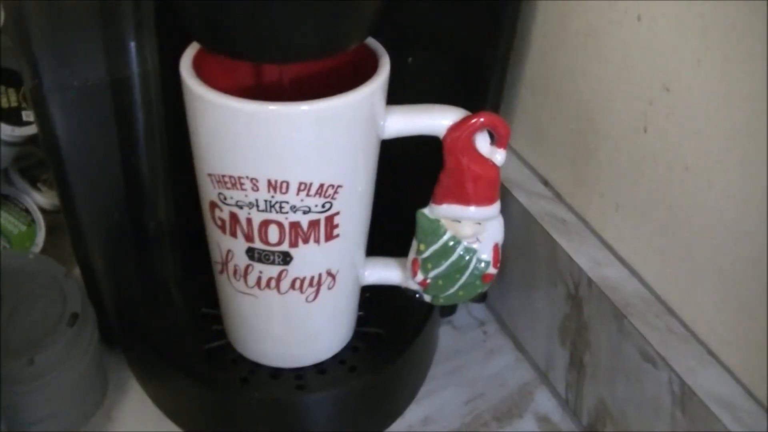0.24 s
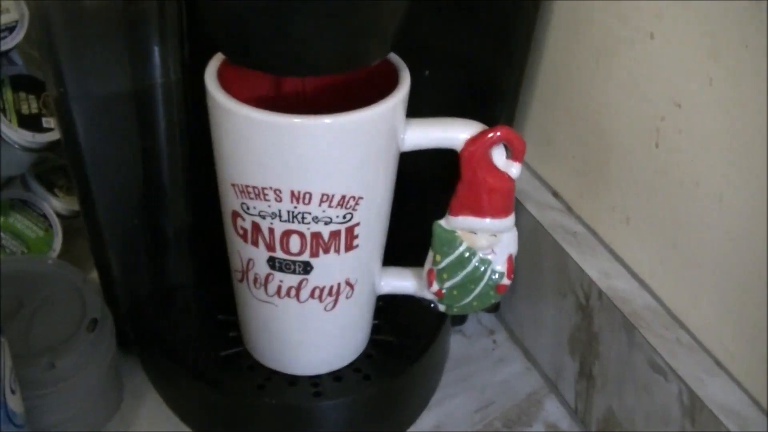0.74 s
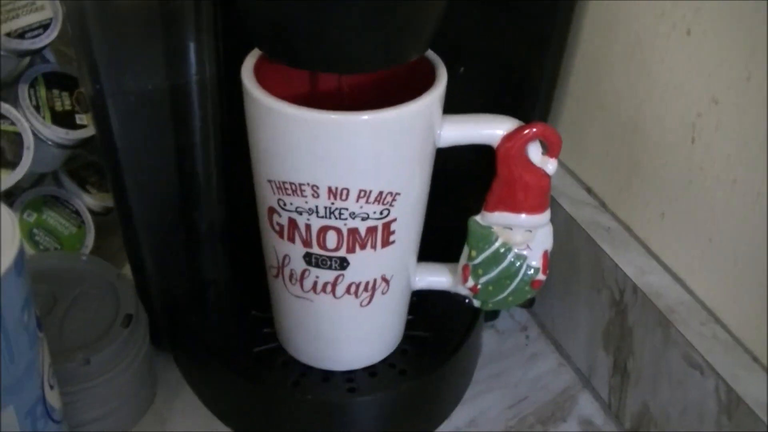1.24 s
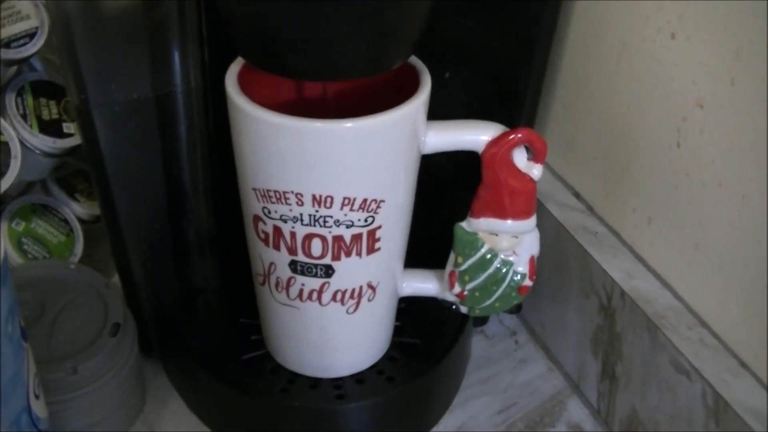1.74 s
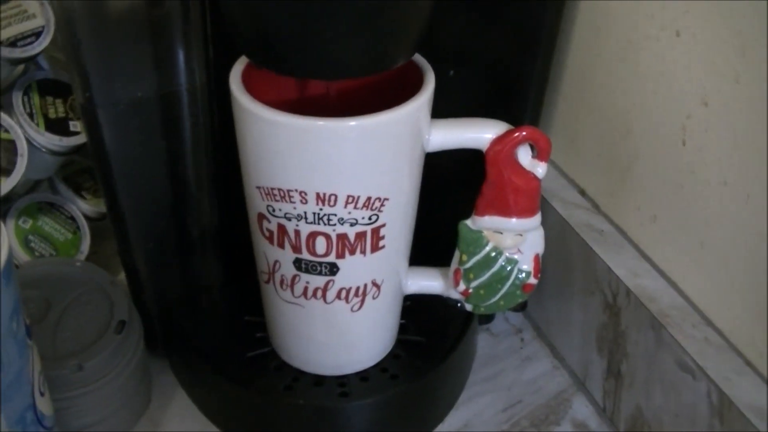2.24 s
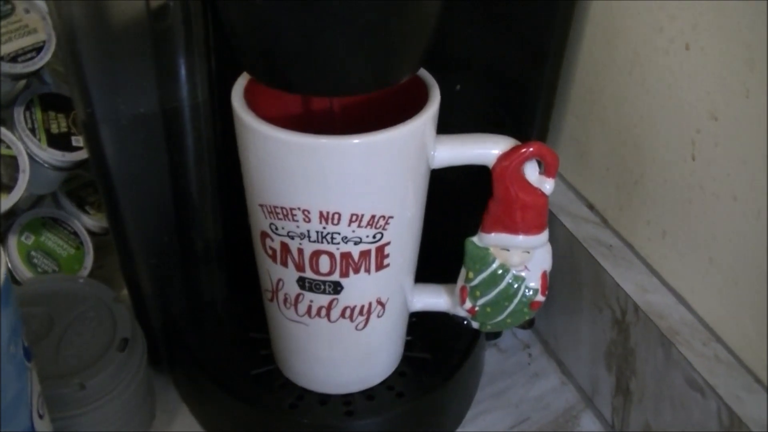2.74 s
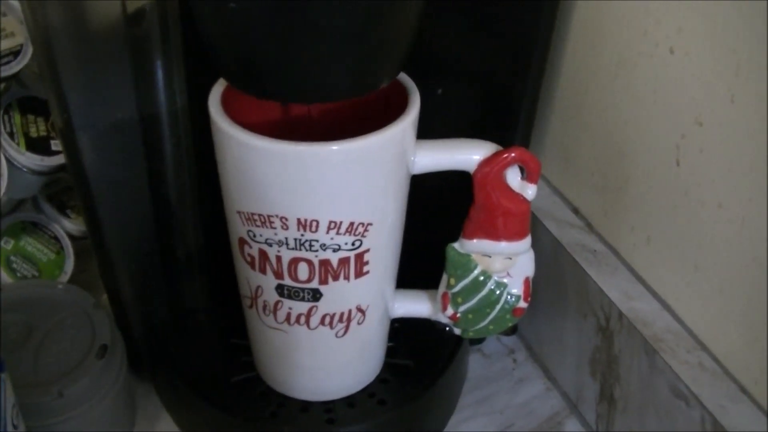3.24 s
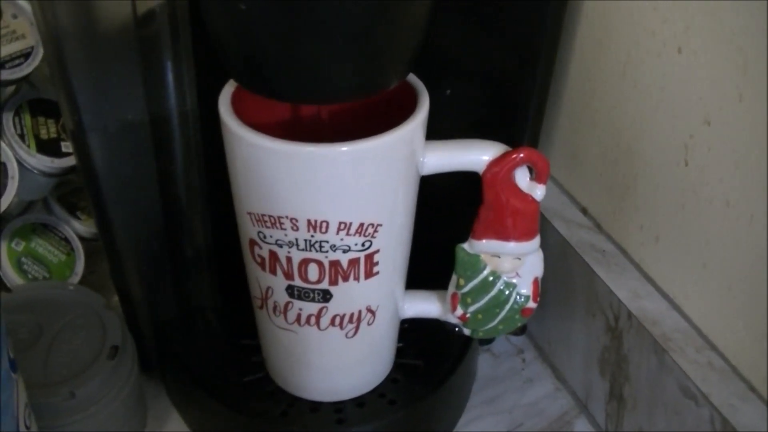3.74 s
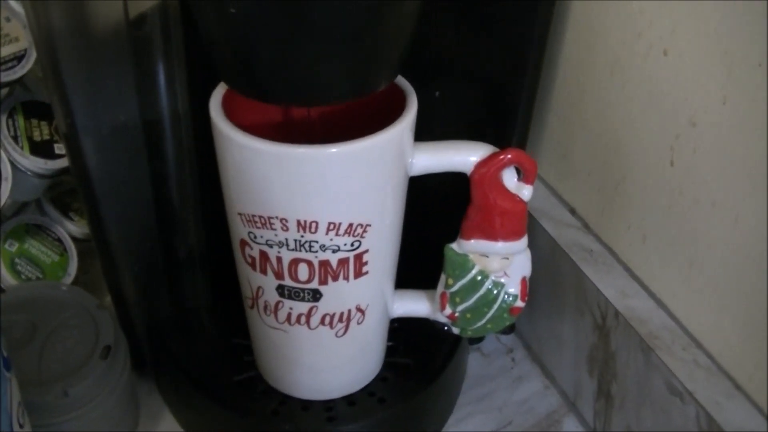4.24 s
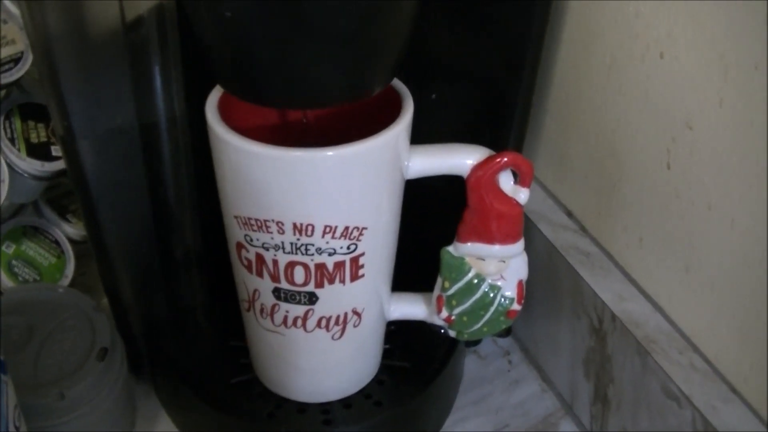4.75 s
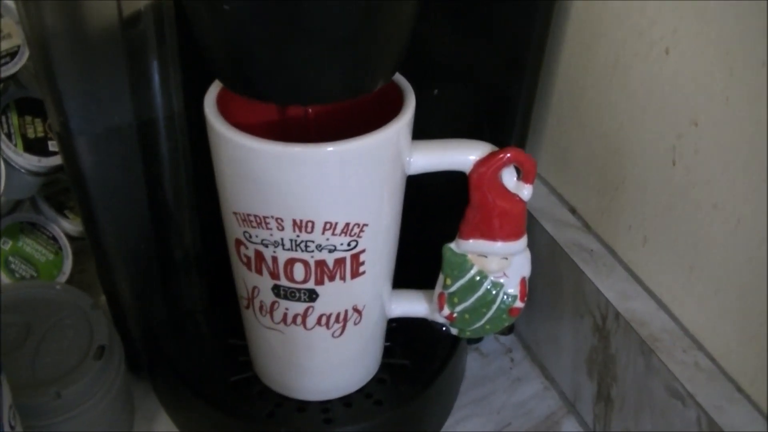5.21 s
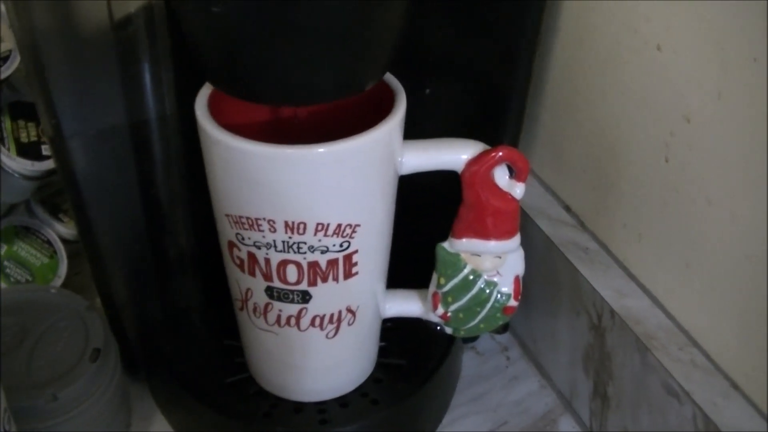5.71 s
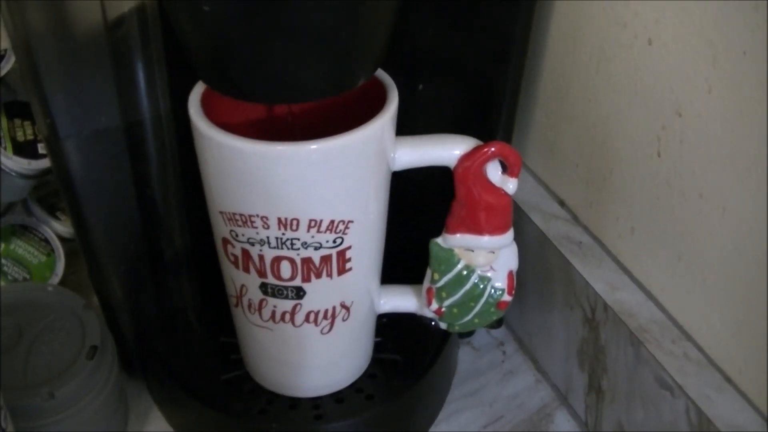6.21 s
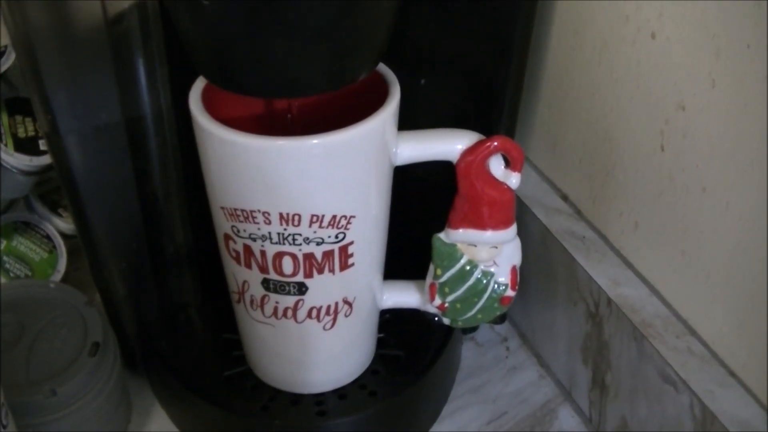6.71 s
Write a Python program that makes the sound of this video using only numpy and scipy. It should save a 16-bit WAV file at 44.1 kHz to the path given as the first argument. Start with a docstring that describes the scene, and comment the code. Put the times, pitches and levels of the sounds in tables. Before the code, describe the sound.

Two sharp plastic snaps, then a small coffee maker's pump hums and rattles steadily while drops plop, before it cuts out into wet sputtering.

```python
"""Two sharp snaps with hollow knocks are heard first, over the running pump of a small coffee maker.
The pump hums on multiples of its shaft turn, rattles, hisses and whines; drops tick and plop in a tall mug.
Near the end the pump stops, and air and water sputter from the spout into the mug.
Snaps, knocks and plops are dying sines; ticks, rattle and sputter are shaped noise; the hum is one
changing waveform per turn. A close hand-held stereo recorder hears it all over room noise and hiss."""
import sys
import numpy as np
from scipy import signal
from scipy.fft import rfft, irfft, next_fast_len
from scipy.io import wavfile
from scipy.ndimage import uniform_filter1d, map_coordinates

SR = 44100
rng = np.random.default_rng(int(sys.argv[2]) if len(sys.argv) > 2 else 0)


def unload_audio(sound):
    """Save the sound as a 16-bit wav file, at the path given as the first command line argument."""
    columns = np.transpose(np.atleast_2d(sound))
    # keep every value between -1 and 1, then stretch to whole-number steps
    steps = np.round(np.clip(columns, -1, 1) * 32767)
    wavfile.write(sys.argv[1], SR, steps.astype(np.int16))


N = 307377
T = np.arange(N) / SR  # seconds
SIZE = next_fast_len(N)
BINS = np.fft.rfftfreq(SIZE, 1 / SR)  # Hz
STOP_S = 6.12  # the pump's power goes off


def undb(db):
    """Turn a level in dB into a gain."""
    return 10 ** (np.asarray(db) / 20)


def level(x, db):
    """Set the rms level in dB."""
    return x * undb(db) / np.sqrt(np.mean(x ** 2))


def over_time(table):
    """Read a (seconds, value) table at every sample."""
    return np.interp(T, *np.transpose(table))


def along(table):
    """Read a (Hz, value) table at every spectral bin, on a log pitch scale."""
    hz, value = np.transpose(table)
    return np.interp(np.log(BINS + 1), np.log(hz), value)


def colour(x, table):
    """Shape a sound's spectrum by (Hz, dB) points."""
    return irfft(rfft(x, SIZE) * undb(along(table)), SIZE)[..., :N]


def resonances(f, table):
    """Response at f Hz of steep resonances (Hz, width in Hz, dB), each applied twice."""
    total = 0
    for hz, width, db in table:
        detuning = hz / width / 1.5 * (f / hz - hz / f)
        total = total + undb(db) / (1 + 1j * detuning) ** 2
    return total


def peaks(x, table):
    """Filter a sound through resonances."""
    return irfft(rfft(x, SIZE) * resonances(BINS + 1, table), SIZE)[..., :N]


def walk(rate):
    """Wandering random levels: each is held for 1 / rate seconds, then the steps are smoothed twice."""
    hold = int(SR / rate)
    steps = np.repeat(rng.standard_normal(N // hold + 1), hold)
    return 0.97 * uniform_filter1d(uniform_filter1d(steps, hold), hold)[:N]


def add(out, s, grain):
    """Mix a short sound in at s seconds."""
    i = int(s * SR)
    out[i:i + len(grain)] += grain[:N - i]


def ring(hz, t60, glide=0., rise_s=0.0003):
    """A sine that falls 60 dB in t60 seconds and may slide up."""
    t = np.arange(int(t60 * SR)) / SR
    sine = np.sin(2 * np.pi * hz * t * (1 + glide * t / t60))
    return sine * undb(-60 * t / t60) * np.minimum(t / rise_s, 1)


def burst(hz, width, t60):
    """A dying puff of noise, filtered twice around one pitch, with peak 1."""
    t = np.arange(int(t60 * SR)) / SR
    shape = undb(-60 * t / t60) * np.minimum(t / 0.0009, 1)
    band = signal.iirpeak(hz, hz / width, SR)
    puff = signal.lfilter(*band, rng.standard_normal(len(t)) * shape)
    puff = signal.lfilter(*band, puff)
    return puff / np.abs(puff).max()


# The colour of room noise and recorder hiss. Each row: pitch in Hz, relative level in dB per Hz.
ROOM = [(25, -21), (60, -26), (100, -5), (200, -2.5), (600, 17.5), (2000, 11), (5000, 0.5), (10000, -5.5),
        (14000, -23), (16000, -34)]


def room():
    """Steady noise of room and recorder: a part shared by both sides and a part of each side's own."""
    common, left, right = colour(rng.standard_normal((3, N)), ROOM)
    return level(common + 1.2 * np.array([left, right]), -49.5)


# Drops and spits that tick. Each row: start in seconds, peak level in dB, centre pitch in Hz,
# level of the duller body in dB against the tick.
TICKS = [(.517, -41, 4000, 8), (0.898, -37, 12500, 6.5), (.9494, -46, 10700, -6), (1.303, -32, 12500, 4),
         (1.345, -42, 10200, -6), (1.5433, -38, 11000, -10), (1.557, -39, 12500, -10),
         (1.6472, -32, 11300, 0), (1.8994, -40, 10800, -6), (2.2257, -39, 6600, -1),
         (2.2265, -43, 10500, -6), (2.8394, -48, 10000, -6), (3.1596, -29, 10400, -3),
         (3.547, -28.5, 10300, -15), (3.816, -35.5, 10000, 2), (4.4994, -43, 10000, -4),
         (4.7007, -33.5, 10000, 0), (5.5337, -39, 10000, -6), (6.205, -29, 6850, -14),
         (6.211, -37, 6970, -9), (6.218, -43, 9000, -8), (6.511, -33, 8720, -7), (6.519, -35, 9710, -8),
         (6.5924, -40, 4600, -8), (6.6876, -36, 12900, -6), (6.7056, -40, 10600, -4),
         (6.7494, -46, 12000, 9), (6.8048, -47, 6290, 3), (6.8333, -41, 11500, -4), (6.854, -43, 6820, -4),
         (6.96, -43, 10500, -6)]
# Single bubbles that plop. Each row: start in seconds, level in dB, starting pitch in Hz.
PLOPS = [(.38, -30, 2530), (.536, -28, 2300), (.548, -27, 2170), (.572, -35, 2500), (.898, -28, 2610),
         (1.303, -35, 3950), (2.204, -28, 1250), (2.205, -31, 884), (4.698, -28, 1300), (6.164, -37, 1150),
         (6.183, -36, 1120), (6.207, -32, 954), (6.224, -38, 1060), (6.206, -28.5, 2840),
         (6.213, -27, 1290), (6.24, -36, 790), (6.3, -33, 777), (6.312, -37, 636), (6.325, -34, 756),
         (6.345, -41, 700), (6.36, -35, 1500), (6.398, -35, 2590), (6.408, -39, 753), (6.42, -39, 720),
         (6.44, -43, 740), (6.465, -41, 760), (6.481, -33, 780), (6.494, -37, 700), (6.512, -26.5, 1030),
         (6.53, -32, 1060), (6.545, -32, 2770), (6.555, -30, 650), (6.562, -44, 2730), (6.578, -31, 2770),
         (6.58, -30.5, 690), (6.595, -38, 2300), (6.595, -32, 890), (6.606, -34, 1500), (6.618, -34, 817),
         (6.619, -34, 1560), (6.62, -32.5, 2020), (6.633, -35, 463), (6.681, -46, 610), (6.72, -35, 1175),
         (6.722, -35, 740), (6.736, -34, 775), (6.748, -36, 1190), (6.685, -39, 3350), (6.862, -40, 3400),
         (6.862, -45, 764), (6.885, -38, 2400), (6.92, -37, 740), (6.925, -38, 2800), (6.94, -37, 2780),
         (6.949, -33, 1350), (6.955, -32, 854)]
TICK_T60_S, TICK_WIDTH_HZ = 0.025, 4600
PLOP_T60_S, PLOP_SHORTER = 0.066, 0.73  # ring time at 1 kHz; power of pitch that shortens it


def drops():
    """Drops tick with a duller splash, bubbles ring and slide up, and fainter ticks scatter at random."""
    out = np.zeros(N)
    for s, db, hz, dull_db in TICKS:
        add(out, s, undb(db) * burst(hz, TICK_WIDTH_HZ, TICK_T60_S))
        add(out, s, undb(db + dull_db) * burst(3170, 2400, TICK_T60_S))
    for s, db, hz in PLOPS:
        t60 = PLOP_T60_S * (1000 / hz) ** PLOP_SHORTER
        add(out, s, undb(db) * ring(hz, t60, glide=0.08, rise_s=0.0019))
        add(out, s, undb(db - 13) * burst(hz, hz / 4, 1.4 * t60))  # rough splash
    for when, pitch, size in rng.random((120, 3)):
        faint_tick = burst(4000 * 3.2 ** pitch, 3000, 0.0091)
        add(out, when * T[-1], undb(-51 + 12.6 * size ** 3) * faint_tick)
    return out


# Sharp snaps. Each row: start in seconds, level in dB, pitch factor, level of the lingering ring
# in dB against the snap.
SNAPS = [(.0705, -9.5, 1.03, -20), (.1203, -5.5, .98, -32)]
# The ways the hard plastic rings. Each row: pitch in Hz before the pitch factor, relative level in dB,
# seconds to fall 60 dB.
SNAP_MODES = [(4120, -6.5, 0.0087), (6250, -1, 0.0061), (8350, -18, 0.011), (9940, -0.5, .006),
              (10800, -2, 0.011), (13800, -10, .006)]
SNAP_RING_HZ, SNAP_RING_T60_S, SNAP_TAIL_DB = 6600, .07, -19


def snaps():
    """A hard plastic part rings briefly in its high modes, with a lingering ring and a noisy tail."""
    out = np.zeros(N)
    for s, db, pitch, ring_db in SNAPS:
        for hz, mode_db, t60 in SNAP_MODES:
            add(out, s, undb(db + mode_db - 6) * ring(hz * pitch, t60, rise_s=.0007))
        add(out, s, undb(db + ring_db) * burst(SNAP_RING_HZ, 500, SNAP_RING_T60_S))
        add(out, s, undb(db + SNAP_TAIL_DB) * burst(7600, 9700, 0.097))
    return out


# Hollow knocks. Each row: start in seconds, level in dB, lift in dB of the modes above 2 kHz.
KNOCKS = [(.013, -38, 11.5), (.0705, -33, 3), (.077, -36, 14), (.1208, -28, 10), (.1283, -30.5, 9),
          (.131, -22.5, -12), (0.1422, -29, 6)]
# The ways the hollow casing rings. Each row: pitch in Hz, relative level in dB, seconds to fall 60 dB.
KNOCK_MODES = [(790, -6, 0.034), (870, 3.5, 0.043), (1160, -1, .03), (1275, 1, 0.03), (2270, -5, 0.02),
               (2380, -5, 0.029), (2690, -4.5, 0.024), (3950, -11.5, .02)]


def knocks():
    """The hollow casing rings in its modes, in slightly different strengths at each knock."""
    out = np.zeros(N)
    for s, db, bright_db in KNOCKS:
        for hz, mode_db, t60 in KNOCK_MODES:
            mode_level = db + mode_db + bright_db * (hz > 2000) + rng.standard_normal()
            add(out, s, undb(mode_level) * ring(hz, t60, rise_s=.0015))
    return out


# Spurts of air and water. Each row: start in seconds, gurgle level in dB, hiss level in dB against the gurgle.
SPUTTER = [(6.15, -41, -22), (6.204, -32.5, 0.5), (6.235, -45, -12), (6.297, -40, -24), (6.35, -44, -23),
           (6.397, -46.5, -15), (6.475, -39.5, -19), (6.51, -38.5, -12), (6.545, -40.5, -16),
           (6.59, -44, -15), (6.615, -33, -24), (6.68, -40, -15), (6.718, -42, -13), (6.75, -46, -11),
           (6.805, -45.5, -5.5), (6.855, -40.5, -10), (6.917, -40.5, -21), (6.945, -44, -15)]
# Resonances of the spout. Each row: pitch in Hz, width in Hz, relative level in dB.
SPOUT = [(211, 51, -7), (448, 130, -7), (740, 320, -8), (1165, 300, -8), (1500, 360, -15)]
# Resonances of the air in the mug. Each row: pitch in Hz, width in Hz, relative level in dB.
MUG = [(2220, 230, 4), (2770, 260, 5), (3230, 270, -2.5), (4550, 200, -2.5), (5600, 370, -7)]
SPURT_T60_S, HARD_DB, HALVING_DB = 0.63, -39, 2.5  # above HARD_DB, each HALVING_DB halves the dying time
SPRAY_DB, SPRAY_DB_PER_S = -10.5, 6.5  # spray against gurgle, growing as the water runs out
DROPLETS_PER_S = 500


def spurts():
    """Loudness over time of gurgle, spray and hiss; overlapping spurts add their powers."""
    power = np.zeros((3, N))
    for s, db, hiss_db in SPUTTER:
        t60 = SPURT_T60_S * .5 ** max((db - HARD_DB) / HALVING_DB, 0)
        spray_db = SPRAY_DB + SPRAY_DB_PER_S * (s - STOP_S)
        t = np.arange(int(t60 * SR)) / SR
        for layer, gain in zip(power, undb([db, db + spray_db, db + hiss_db])):
            add(layer, s, (gain * undb(-60 * t / t60)) ** 2 * np.minimum(t / 0.0033, 1))
    return np.sqrt(power)


def sputter():
    """Each spurt bursts bubbles in the spout, rings the air in the mug with a spray of droplets and hisses."""
    start = SPUTTER[0][0]
    bubbles = np.zeros(N)
    for when, pitch, size in rng.random((400, 3)):
        hz = 480 * 3.5 ** pitch ** 1.5
        bubble = undb(6.9 * size) * ring(hz, 32 / hz, glide=0.07)
        add(bubbles, start + when * (T[-1] - start), bubble)
    bubbles = bubbles / bubbles[T > start].std() * undb(-2.5)
    froth = rng.standard_normal((3, N)) * undb([1.1 * walk(60), 3 * walk(90), 3.9 * walk(150)])
    # gurgle and spray are random droplet hits over a weaker steady noise
    froth[:2] *= .16 + (rng.random((2, N)) < DROPLETS_PER_S / SR)
    gurgle = level(peaks(froth[0], SPOUT), -7) + bubbles
    spray = level(peaks(froth[1], MUG), 0)
    hiss = level(peaks(froth[2], [(5800, 3900, 8.6), (10000, 5300, 2.8)]), 0)
    return np.sum(spurts() * [gurgle, spray, hiss], axis=0)


def flare(turn, shares, depth, length):
    """Gain that jumps at the given shares of each shaft turn and dies away."""
    return 1 + depth * sum(np.exp(-((turn - share) % 1) / length) for share in shares)


# The colour of loose parts and running water. Each row: pitch in Hz, relative level in dB per Hz.
RATTLE = [(150, -31), (300, -6.5), (440, -14), (600, -11), (860, 4), (1010, -10), (1150, 0.5), (1290, -3),
          (1960, -14), (2400, -7), (3400, -6.5), (4550, -12.5), (7500, -18), (10000, -17.5), (11500, -20.5),
          (14000, -25.5), (16000, -56)]
# Resonances of the casing. Each row: pitch in Hz, width in Hz, relative level in dB.
CASING = [(1500, 80, 0.5), (1730, 147, -3), (2172, 170, 0.5), (2590, 94, -1.5), (2846, 300, -7.5),
          (3253, 86, -1), (3390, 167, -4.5), (3657, 62, -8), (4200, 28, -8.5), (4400, 35, -41),
          (4860, 90, -36), (5110, 190, -14.5), (6630, 290, -40), (8150, 190, -19.5), (8980, 440, -19.5),
          (9830, 300, -14), (10800, 280, -18)]


def rattle(turn):
    """Two channels of noise from loose parts and the ringing casing, each flaring twice a turn."""
    flutter = undb(0.43 * walk(25.06) + 1.8 * walk(200))
    loose = rng.standard_normal((2, N)) * flare(turn, (.03, .74), depth=1.0, length=0.031) * flutter
    casing = rng.standard_normal((2, N)) * flare(turn, (.39, .89), depth=0.75, length=0.056)
    return level(colour(loose, RATTLE), -48) + level(peaks(casing, CASING), -46)


# The narrow hiss near 9 kHz grows while the pump runs. Each row: time in seconds, level in dB.
NARROW = [(0, -78), (3, -79), (4.2, -64.5), (6.1, -63)]


def narrow_hiss():
    """Noise through one resonance, following a level over time."""
    return level(peaks(rng.standard_normal(N), [(9100, 540, 0)]), 0) * undb(over_time(NARROW))


WHINE_HZ, WHINE_DB, WHINE_IDLE_DB, WHINE_FALL_S = 10016, -64.5, -69, .06  # levels before the pulsing


def whine(turn, off):
    """The supply's steady tone, pulsed by three strokes a turn, sinks to an idle level at power off."""
    whine_db = WHINE_IDLE_DB + (WHINE_DB - WHINE_IDLE_DB) * np.exp(-off / WHINE_FALL_S)
    strokes = 1 + .5 * np.cos(2 * np.pi * 3 * turn)
    tone = np.sqrt(2) * np.sin(2 * np.pi * WHINE_HZ * T)
    return tone * strokes * undb(.4 * walk(3)) * undb(whine_db)


def smooth(x, size, axis):
    """Running mean of complex numbers."""
    return uniform_filter1d(x.real, size=size, axis=axis) + 1j * uniform_filter1d(x.imag, size=size, axis=axis)


# Relative strength in dB of the hum's multiples of the shaft turn (orders) 1, 2, 3 .. 63, one per entry.
ORDER_DB = [-118, -111, -87, -92, -96, -63, -74, -78, -60, -60, -73, -51, -61, -54, -44, -63, -69, -57, -58,
            -56, -78, -59, -69, -51, -46, -47, -48, -56, -56, -65, -72, -67, -69, -64, -67, -52, -52, -47,
            -53, -54, -60, -58, -70, -63, -71, -89, -63, -68, -58, -60, -59, -58, -63, -75, -65, -55, -59,
            -61, -53, -61, -56, -60, -65]
# The same for orders 64, 65 .. 150, in dB.
UPPER_ORDER_DB = [-61, -65, -66, -66, -62, -62, -63, -64, -63, -66, -65, -65, -65, -75, -66, -72, -71, -70,
                  -69, -77, -67, -67, -64, -63, -77, -77, -62, -73, -63, -69, -58, -79, -66, -66, -66, -78,
                  -65, -76, -69, -71, -63, -66, -59, -66, -64, -66, -71, -77, -59, -68, -60, -66, -69, -78,
                  -80, -81, -72, -71, -75, -79, -80, -78, -79, -77, -84, -85, -84, -84, -82, -78, -74, -80,
                  -76, -75, -68, -74, -77, -82, -84, -85, -84, -80, -79, -84, -87, -88, -85]
# Blows within one turn that set off each range of orders. Each row: highest order of the range,
# moment as a share of the turn, relative strength in dB.
BLOW = [(22, .258, -2), (22, .648, -1), (22, .819, 0), (33, .131, 0), (33, .417, -1), (45, .136, 0),
        (45, .916, -1), (54, .151, -5), (54, .523, 0), (54, .862, -3), (68, .397, 0), (68, .528, -6),
        (68, .908, -1), (83, .408, -1), (83, .51, -5), (83, .919, 0), (100, .115, -6), (100, .4, -1),
        (100, .895, 0), (128, .22, -3), (128, .377, -3), (128, .893, 0), (150, .009, 0), (150, .768, -2),
        (150, .824, 0)]
# The sixth order swells as the pressure changes. Each row: time in seconds, change in dB.
SIXTH = [(0, 0), (.3, -4.5), (1.3, -1), (2.4, -3), (2.8, -10.5), (3.1, -1.5), (3.3, -0.5), (4.5, 2.5),
         (6.2, 2.5)]


def hum(turn, drift, jitter, jitter_slope):
    """One waveform per shaft turn, its orders lined up on the blows, a little different every turn."""
    size, turns = 2048, int(turn[-1]) + 2
    last, share, blow_db = np.transpose(BLOW)
    k = np.arange(1, int(last[-1]) + 1)
    gain = undb(ORDER_DB + UPPER_ORDER_DB)
    own = last[np.searchsorted(last, k)][:, None] == last  # which blows belong to each order
    phase = np.angle((own * np.exp(-2j * np.pi * np.outer(k, share))) @ undb(blow_db))
    middle_blow = (own @ np.arange(len(last))) // own.sum(1)
    phase += 2.4 * middle_blow  # each range rings with its own lag
    slow, quick = (rng.standard_normal((turns, len(k), 2)) @ [1, 1j] for _ in range(2))
    # orders drift over about a second; the high ones also change more from turn to turn
    slow = smooth(slow, 25, axis=0)
    # neighbouring orders change together, so each blow is harder or softer than in the turn before
    quick = np.sqrt(5) * smooth(quick, 5, axis=1)
    change = 1 + drift * (1 + k / 40) * slow + (jitter + jitter_slope * k / 100) * quick
    turn_s = np.interp(np.arange(turns), turn, T)
    change[:, 5] *= undb(np.interp(turn_s, *np.transpose(SIXTH)))
    spectra = np.zeros((turns, size // 2 + 1), complex)
    spectra[:, k] = change * gain * np.exp(1j * phase) * size / np.sqrt(2)
    waves = irfft(spectra, size, axis=1)
    waves = np.hstack([waves, waves[:, :1]])
    # read across the turn and blend from one turn's waveform to the next
    return map_coordinates(waves, [turn, turn % 1 * size], order=1)


# The shaft's speed before coasting slows it. Each row: time in seconds, speed in turns per minute.
SHAFT = [(0, 1803), (.45, 1800), (.65, 1795), (.9, 1805), (1.5, 1806), (1.8, 1798), (2.1, 1799),
         (2.7, 1785), (3.0, 1794), (3.2, 1805), (3.6, 1803), (4.05, 1798), (4.45, 1805), (4.7, 1814),
         (5.25, 1804), (5.7, 1806), (6.05, 1793)]
# How strongly the rattle differs between the two sides. Each row: pitch in Hz, gain in dB.
UNALIKE_DB = [(60, -15), (250, -13), (2000, -12.5), (4000, -17), (9000, -6), (12000, -25)]
COAST_DB_PER_S, COAST_SAG_PER_S = 234, 1.2  # fading and slowing of the coasting shaft


def pump():
    """The turning shaft times hum, rattle and whine; also returns the rattle that differs between sides."""
    off = np.maximum(T - STOP_S, 0)  # seconds since power off
    rpm = over_time(SHAFT) * np.exp(-COAST_SAG_PER_S * off)
    turn = np.cumsum(rpm) / 60 / SR
    run = undb(-COAST_DB_PER_S * off)
    shared, scattered = rattle(turn) * run
    tone = undb(.5) * hum(turn, drift=.15, jitter=.04, jitter_slope=.18) * run
    motor = tone + shared + narrow_hiss() * run + whine(turn, off)
    return motor, colour(scattered, UNALIKE_DB)


# Level difference between the microphone ports. Each row: pitch in Hz, left minus right in dB.
PORTS_DB = [(60, -1.0), (110, -1.5), (200, -5.0), (380, -6.0), (700, -4.0), (1290, -2.5), (2380, -0.5),
            (4400, -1.0), (8120, -1.5), (15000, 0.0)]
# Phase difference between the ports. Each row: pitch in Hz, lead of the left in radians.
PORTS_RAD = [(300, 0.31), (1500, 0.2), (2600, 0.26), (4800, 0.41), (7700, 1), (10000, 0.42), (12000, 0.97)]


def microphone_ports(near):
    """Left and right differ in colour and phase, while their sum keeps the colour of the source."""
    spectrum = rfft(near, SIZE)
    tilt = undb(along(PORTS_DB) / 2) * np.exp(.5j * along(PORTS_RAD))
    sides = np.array([spectrum * tilt, spectrum / tilt])
    return irfft(sides / np.abs(tilt + 1 / tilt) * 2, SIZE)[:, :N]


# Microphone colour for snaps, knocks, drops and sputter. Each row: pitch in Hz, gain in dB.
MIC = [(25, -32), (100, -18), (160, -9), (220, -4.5), (11000, 0), (14000, -1), (15800, -7)]


def scene():
    """All sources at the two microphone ports, over the room."""
    motor, scattered = pump()
    noises = colour(snaps() + knocks() + drops() + sputter(), MIC)
    return microphone_ports(motor + noises) + [scattered, -scattered] + room()


TOP_HZ = 15800


def record(dry):
    """The recorder steeply cuts everything above its top pitch."""
    return signal.sosfilt(signal.ellip(12, .2, 70, TOP_HZ, fs=SR, output="sos"), dry)


dry = scene()
out = record(dry)
unload_audio(out)
```